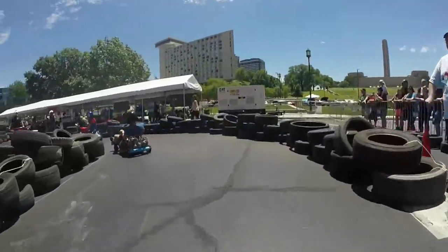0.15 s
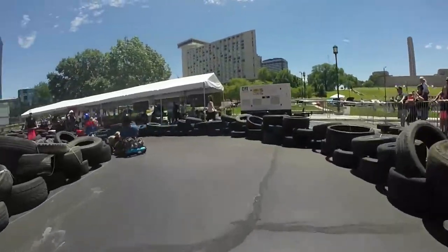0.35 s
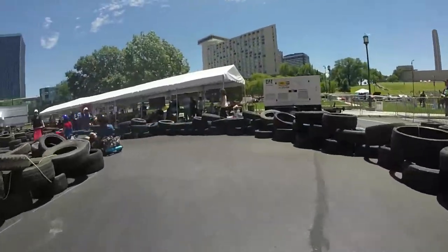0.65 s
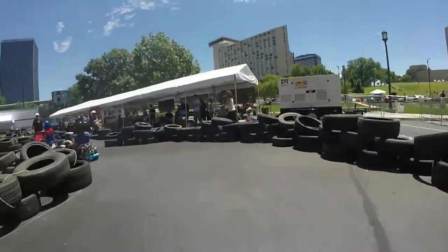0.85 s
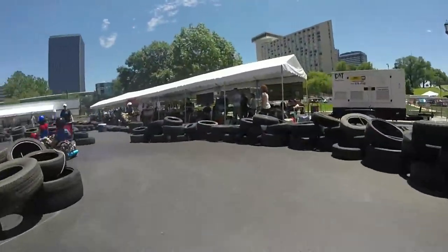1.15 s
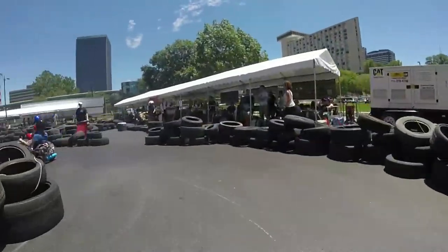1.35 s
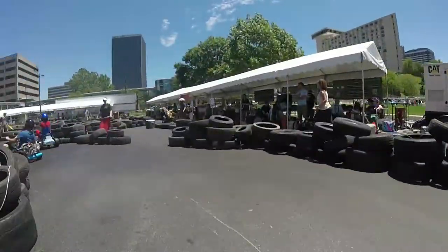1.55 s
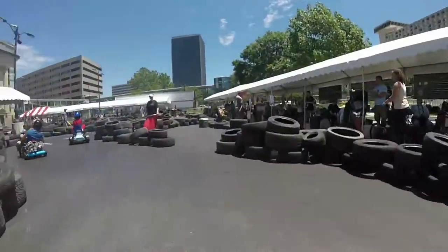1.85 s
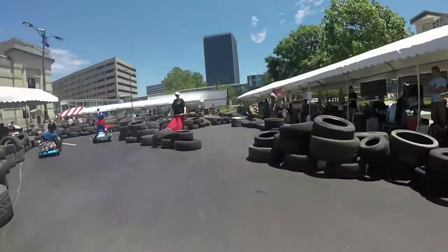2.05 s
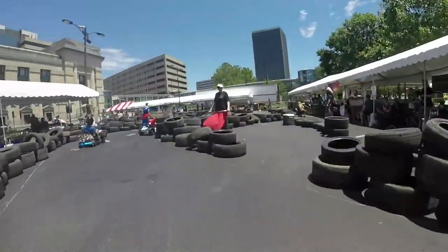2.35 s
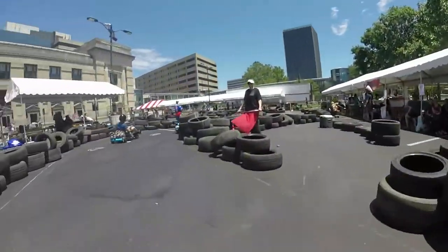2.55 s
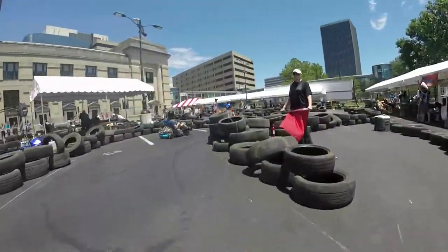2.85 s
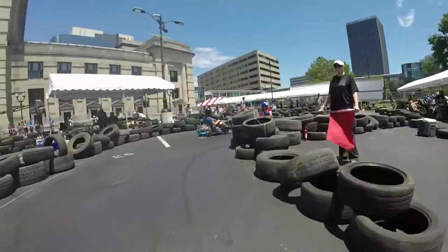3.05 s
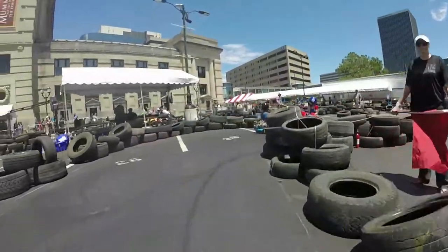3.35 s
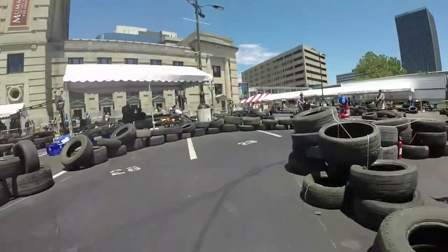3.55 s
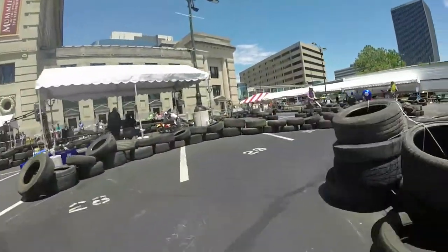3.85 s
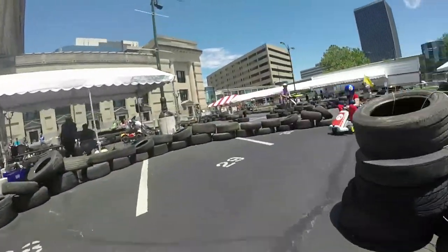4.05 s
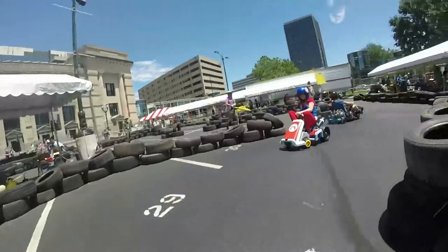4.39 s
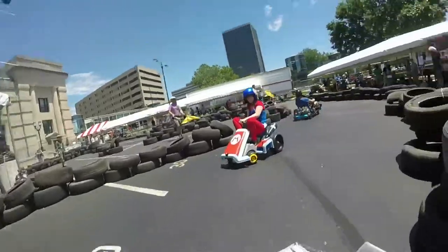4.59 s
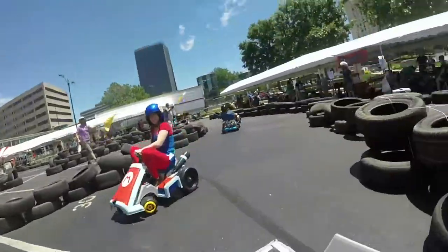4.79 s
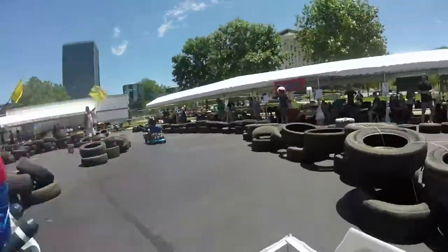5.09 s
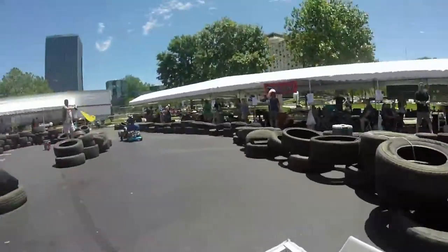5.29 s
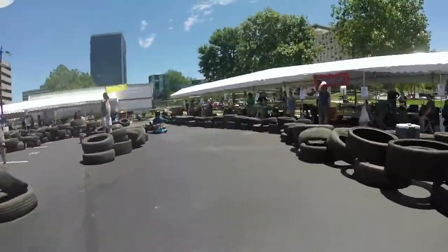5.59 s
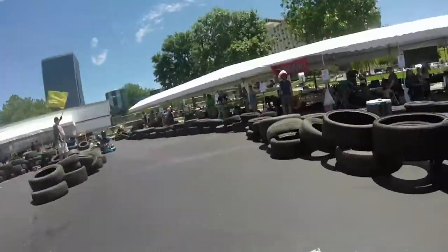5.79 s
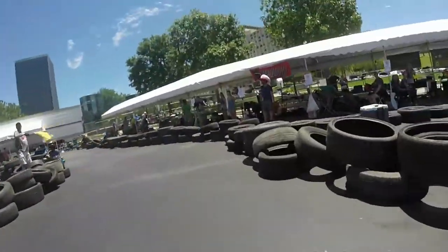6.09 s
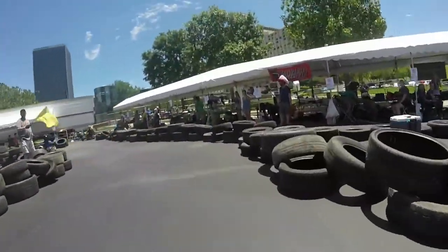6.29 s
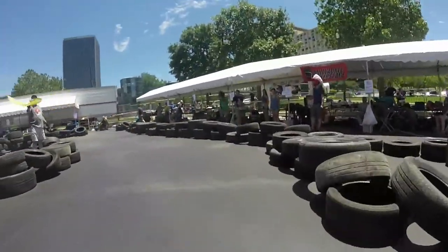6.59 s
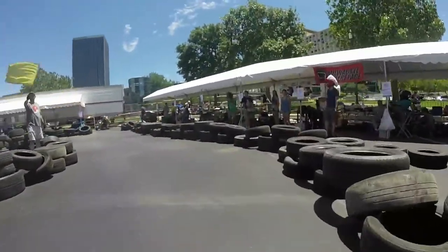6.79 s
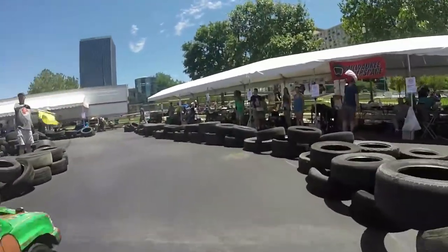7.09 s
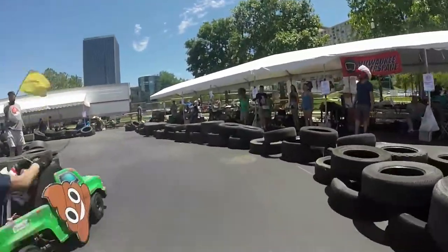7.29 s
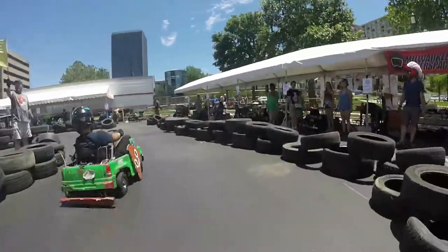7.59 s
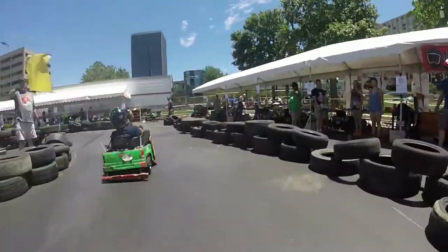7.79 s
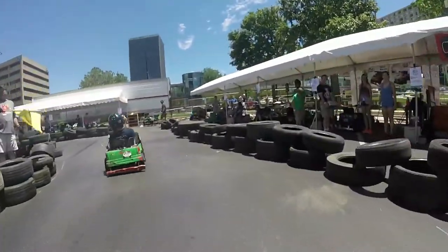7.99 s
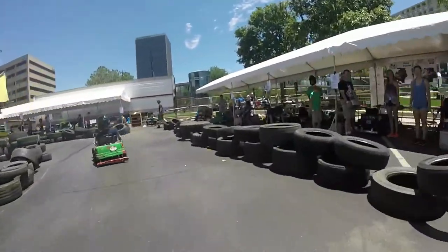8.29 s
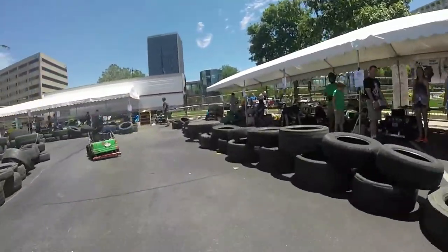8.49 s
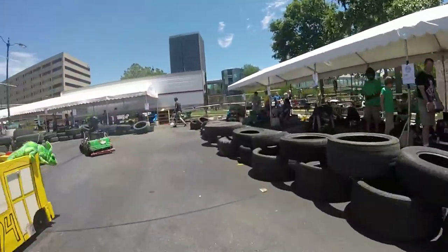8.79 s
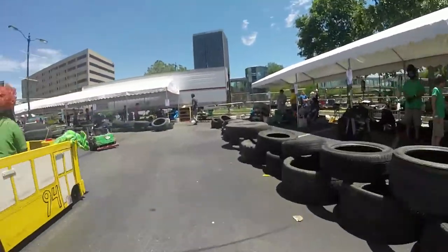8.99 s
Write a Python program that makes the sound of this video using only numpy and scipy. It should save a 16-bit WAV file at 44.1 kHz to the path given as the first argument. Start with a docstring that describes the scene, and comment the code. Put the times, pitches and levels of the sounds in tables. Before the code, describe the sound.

A cased microphone bolted to an electric kart picks up muffled, strong frame vibration. First comes a steady nasal drone of motor and chain with fine rattle and buzz. Power is released, leaving dull rumble, two main clusters of hard bumps and loose clatter, a faint squeak and the airy tyre hiss of a passing kart. Finally the motor surges in, lower and rougher, rising in pitch with scattered knocks.

```python
"""A small electric kart on asphalt, heard by a cased microphone bolted to its frame.
It cruises: motor and chain hum (sines on shaft multiples) over road rumble, rocking and faint hiss (noise, low sine).
Loose parts rattle, tick and buzz with the chain, and knock irregularly (contacts into resonances).
From 4.6 s it coasts over bumps that thud and shake loose parts, with a thin squeak (narrow noise),
as another kart's tyre hiss draws up and passes; from 6.8 s motor and chain pull again."""
import sys
import numpy as np
from scipy import signal
from scipy.fft import rfft, irfft
from scipy.io import wavfile
from scipy.ndimage import uniform_filter1d

SR = 44100
rng = np.random.default_rng(int(sys.argv[2]) if len(sys.argv) > 2 else 0)


def invert_db(level):
    """Linear amplitude ratio for a level in decibels (20 dB per decade), elementwise."""
    return 10 ** (np.asarray(level, dtype=float) / 20)


def wav_out(sig):
    """Save sig, one row per channel (or a flat mono array), as 16-bit PCM at SR to the path in sys.argv[1]."""
    wavfile.write(sys.argv[1], SR, np.round(np.clip(np.atleast_2d(sig).T, -1, 1) * 32767).astype(np.int16))


N = 403074
T = np.arange(N) / SR   # s

# power on, cruising: at_s, shaft_hz, load_db
CRUISE = [(0.0, 105.3, 2), (0.35, 106.8, 0), (0.6, 108.7, -0.5), (1.0, 111, -1.5), (1.399, 114.7, 0.5),
          (1.95, 114.5, -1), (2.15, 111.9, 1), (2.55, 109.7, -1.5), (2.851, 109.1, -0.5), (3.099, 109.5, 0),
          (3.4, 108.1, 0.5), (3.899, 108.8, 0.5), (4.079, 106.2, -0.5), (4.339, 108, 0.5),
          (4.499, 107.6, -0.5), (4.55, 101.8, -0.5), (4.6, 102.4, -17.5)]
# power on, accelerating: at_s, shaft_hz, load_db
SPEED_UP = [(6.8, 35, -13), (6.86, 37.79, -10.5), (6.9, 52.07, -4), (6.93, 63.83, -1.5), (6.981, 63.77, 0),
            (7.049, 61.93, 0), (7.35, 65.7, -2.5), (7.56, 67.93, -1), (7.72, 70.53, 0), (8.12, 76.77, -1),
            (8.22, 75.92, -2.5), (8.48, 79.24, 0.5), (8.56, 80.25, -0.5), (8.75, 81.6, 0),
            (8.92, 82.85, -2.5), (9.14, 86.8, 3.5)]
# strong multiples of the shaft rate: chain mesh, motor 3 and 4, twice the mesh, motor 6
LOUD_ORDERS = [2.1, 3, 4, 4.2, 6]
MESH_ORDER = LOUD_ORDERS[0]
# roughness of the asphalt under the tyres, as the frame feels it: at_s, level_db
RUMBLE = [(0.0, -24), (0.8, -22.5), (2.4, -25.5), (3.2, -23.5), (4.5, -23.5), (4.62, -27), (4.92, -24),
          (4.94, -14), (5.03, -17), (5.06, -20.5), (5.32, -18), (5.55, -22.5), (5.62, -32), (5.72, -29),
          (5.74, -17.5), (5.82, -23), (5.95, -28), (6.5, -25), (6.6, -19.5), (6.93, -15), (7.13, -28),
          (7.55, -26), (8.3, -23), (9.14, -22)]
CRUISE_END_S, PULL_START_S = CRUISE[-1][0], SPEED_UP[0][0]
TICKS_END_S = 3.8   # then the part shakes free and the rattle comes in gasps


def rms_one(x):
    """Scales to an rms of 1."""
    return x / np.sqrt(np.mean(x ** 2) + 1e-20)


def in_time(rows):
    """Columns of a table at every sample."""
    s, *columns = np.transpose(rows)
    return [np.interp(T, s, c) for c in columns]


def at_hz(points, hz):
    """Level (dB) read from (Hz, dB) points on a log frequency axis."""
    point_hz, point_db = np.transpose(points)
    return np.interp(np.log(hz), np.log(point_hz), point_db)


def drift(cutoff_hz):
    """Slow chance through a double one-pole low-pass; spread 1."""
    r = np.exp(-40 * np.pi * cutoff_hz / SR)   # runs at SR / 20
    noise = rng.standard_normal(N // 20 + 4002)
    slow = signal.lfilter([1], [1, -2 * r, r * r], noise)[4000:]
    return np.interp(np.arange(N) / 20, np.arange(len(slow)), rms_one(slow - slow.mean()))


def resonance(x, hz, width_hz):
    """Two-pole resonance, gain 1 on top."""
    r = np.exp(-np.pi * width_hz / SR)
    poles = [1, -2 * r * np.cos(2 * np.pi * hz / SR), r * r]
    return signal.lfilter([(1 - r * r) / 2, 0, (r * r - 1) / 2], poles, x + 1e-18)


def resonance_twice(x, hz, width_hz):
    """The same resonance twice in series, for steeper skirts."""
    return resonance(resonance(x, hz, width_hz), hz, width_hz)


def body(x, modes):
    """Parallel resonances with alternating signs."""
    return sum((-1) ** k * invert_db(db) * resonance(x, hz, width_hz)
               for k, (hz, width_hz, db) in enumerate(modes))


def cut(x, hz, kind, order=2):
    """Butterworth filter."""
    return signal.sosfilt(signal.butter(order, hz, kind, fs=SR, output="sos"), x)


def struck(events, modes, tilt_db, spread_db, contact_s, grit_share):
    """Every blow is a short dying crunch that strikes each mode with a strength of its own."""
    at = (np.array(events)[:, 0] * SR).astype(int)
    level_db = np.array(events)[:, 1]
    chance = rng.normal(0, 1, (len(at), len(modes)))
    grit, r = rng.standard_normal(N), np.exp(-1 / (contact_s * SR))
    out = 0
    for k, (hz, width_hz, db) in enumerate(modes):
        clicks = np.zeros(N)
        blow_db = level_db + db + tilt_db(hz) + spread_db * chance[:, k]
        clicks[at] = invert_db(blow_db) * SR / (2 * np.pi * width_hz)
        dying = signal.lfilter([1], [1, -r], clicks + 1e-18)
        crunch = clicks + grit_share * np.sqrt(1 - r * r) * grit * dying
        out = out + (-1) ** k * resonance(resonance(crunch, hz, width_hz), hz, 1.3 * width_hz)
    return out


def drive(rows, loud_db, faint_db, throb, waver_db, wander_db):
    """Sines on multiples of the shaft; the axle's turn makes the load throb. Returns tone and shaft turns."""
    # weaker multiples; whole = motor, steps of 2.1 = chain mesh
    faint_orders = [5, 6.3, 7, 8, 8.4, 9, 10, 10.5, 12, 12.6, 14, 14.7, 17, 18, 19, 20, 21, 24, 30, 36]
    # the frame lifts a strong multiple as it slides through a resonance: hz, gain_db
    frame_lift = [(133, -23), (160, -13.5), (171, -12.5), (182, -0.5), (193, -13.5), (206, -3.5), (228, 0),
                  (245, 3.5), (265, -6), (290, -9.5), (318, 5), (345, -5.5), (385, 1.5), (430, -8),
                  (460, -8), (500, -14.5), (522, -9.5), (632, 0.5), (655, -7.5), (685, -10.5)]
    # how well the frame passes the weak multiples: hz, gain_db
    frame_pass = [(300, 5), (780, -3), (1000, -15), (1300, 4.5), (1700, 2), (2000, -4.5), (2600, 1),
                  (3000, -15)]
    axle_order = 0.13   # axle turns per shaft turn
    shaft_hz, load_db = in_time(rows)
    fade_in = np.clip((T - rows[0][0] + 0.024) / 0.031, 0, 1)
    fade_out = np.clip((rows[-1][0] + 0.023 - T) / 0.069, 0, 1)
    on = fade_in * fade_out
    live = on > 0
    turns = np.cumsum(shaft_hz * (1 + .0012 * drift(12))) / SR
    load = invert_db(load_db) * (1 + throb * drift(0.86) * np.sin(2 * np.pi * axle_order * turns))
    wavers = [waver_db * drift(24) for k in range(4)]
    tone = np.zeros(N)
    for order, db, wander in zip(LOUD_ORDERS, loud_db, wander_db):
        lift_db = at_hz(frame_lift, order * shaft_hz)
        level_db = db + lift_db + wander * drift(4.4) + 0.15 * wavers[int(order) % 4]
        sine = np.cos(2 * np.pi * order * turns + (order - 2.1) ** 2)
        tone[live] += (invert_db(level_db) * sine)[live]
    for k, (order, db) in enumerate(zip(faint_orders, faint_db)):
        level_db = db + at_hz(frame_pass, order * shaft_hz[live]) + wavers[k % 4][live]
        tone[live] += invert_db(level_db) * np.cos(2 * np.pi * order * turns[live] + k * k)
    return np.sqrt(2) * on * load * tone, turns


def cruise():
    """Motor and chain at cruising speed, the chain mesh strongest."""
    # strong multiples, before frame and load: level_db
    strong_db = [-11, -23.5, -32.5, -30, -26]
    # weak multiples, before frame and load: level_db
    weak_db = [-44.5, -49, -63.5, -48, -34.5, -48.5, -51, -48.5, -57, -52.5, -61, -52.5, -57.5, -54.5,
               -50.5, -54.5, -58.5, -58, -66.5, -68]
    return drive(CRUISE, strong_db, weak_db, throb=0.12, waver_db=3.5, wander_db=[0.6, 2.3, 4.4, 4.0, 1.6])


def road():
    """Rough asphalt as lumpy noise into the frame modes, and the bumps as soft blows."""
    # frame resonances: hz, width_hz, level_db
    frame_modes = [(94, 67, -12.5), (173.5, 46.3, -5.5), (209.4, 49.6, -0.5), (318, 28.4, 2), (403, 60, -9),
                   (492, 80, -13.5), (630, 130, -19)]
    # bumps under the wheels: at_s, level_db
    thuds = [(4.838, -42), (4.929, -2), (4.941, -1), (4.971, -12), (4.982, 5), (4.996, 2), (5.021, 2),
             (5.081, -12), (5.239, -9), (5.383, -12), (5.429, -12), (5.728, -6), (5.769, -0.5),
             (5.858, -23), (6.071, -7.5), (6.646, -4.5), (6.771, -12), (6.826, -8), (6.87, -8)]
    level_db, = in_time(RUMBLE)
    lumpy = rng.standard_normal(N) * invert_db(2.2 * drift(22))
    rolling = invert_db(level_db) * rms_one(cut(body(lumpy, frame_modes), 650, "low"))
    damped_modes = [(hz, 1.74 * width_hz, db) for hz, width_hz, db in frame_modes]
    blows = struck(thuds, damped_modes, lambda hz: -7.0, spread_db=6.5, contact_s=0.0013, grit_share=0.4)
    bumps = cut(blows, 710, "low")
    return cut(rolling + bumps, 95, "high")


def bounce():
    """The kart rocks on its tyres at a wandering low pitch, over a dull floor; each jolt swells and dies."""
    # jolts that set it rocking: at_s, level_db
    jolts = np.array([(0.02, -26.5), (0.409, -27.5), (0.75, -27), (0.95, -31), (1.218, -34), (1.7, -36.5),
                      (1.93, -31), (2.39, -36.5), (3.0, -33), (3.3, -30.5), (3.689, -33.5), (4.0, -30.5),
                      (4.5, -26.5), (4.68, -22), (4.95, -34), (5.16, -26.5), (5.3, -33.5), (5.52, -31),
                      (5.76, -10.5), (5.949, -24.5), (6.188, -32.5), (6.079, -25.5), (6.3, -33.5),
                      (6.601, -26), (6.7, -31.5), (6.849, -19), (7.45, -37), (7.851, -30.5), (8.15, -32),
                      (8.45, -29.5), (8.85, -32.5)])
    rise_s, hold_s, fall_db_per_s, rest_db = 0.014, 0.07, 153, -38
    floor_db = -43.5
    coarse_s = np.arange(0, N, 40) / SR
    since_s = coarse_s - jolts[:, :1]
    dying = invert_db(jolts[:, 1:] - fall_db_per_s * np.maximum(since_s - hold_s, 0))
    each = dying * np.clip(1 + since_s / rise_s, 0, 1)
    swing = np.interp(T, coarse_s, np.sqrt(np.sum(each ** 2, axis=0) + invert_db(rest_db) ** 2))
    rocking_hz = 27 + 7.1 * drift(3.0)
    rocking = np.sin(2 * np.pi * np.cumsum(rocking_hz) / SR) * invert_db(0.91 * drift(6))
    # the dull low rumble is louder while coasting
    coasting_s = [CRUISE_END_S - .1, CRUISE_END_S, PULL_START_S, PULL_START_S + .1]
    coasting_db = np.interp(T, coasting_s, [-6, 7.0, 4.5, -0.5])
    dull = rms_one(cut(rng.standard_normal(N), [30, 130], "band"))
    floor = invert_db(floor_db + coasting_db + 2.1 * drift(5.5)) * (swing / swing.mean()) ** 0.59 * dull
    return np.sqrt(2) * swing * rocking + floor


def touches(tone, turns, steep_db, burst_db):
    """One contact near the crest of every chain-mesh cycle, harder on high crests, coming in quick bursts."""
    teeth = np.maximum.accumulate(np.floor(MESH_ORDER * turns + 0.055 + .013 * drift(120)))
    crest = tone / np.sqrt(uniform_filter1d(tone ** 2, size=2000) + 1e-6)
    bursts = np.tanh(3.4 * rms_one(resonance(rng.standard_normal(N), 19, 11)))
    return (np.diff(teeth, prepend=teeth[0]) > 0) * invert_db(steep_db * crest + burst_db * bursts)


def touching():
    """Strength with which the loose part rests against the frame."""
    # spells of contact once per chain tooth: start_s, length_s, level_db
    spells = [(0.12, 0.21, -67), (0.392, 0.03, -62), (0.532, 0.072, -60.5), (0.722, 0.018, -65),
              (0.876, 0.034, -57), (0.961, 0.07, -65), (1.213, 0.51, -58.5), (1.786, 0.15, -64),
              (1.973, 0.43, -60), (2.445, 0.3, -58.5), (2.785, 0.11, -58.5), (3.013, 0.2, -60.5),
              (3.336, 0.033, -60.5), (3.523, 0.098, -60), (3.774, 0.09, -62.5), (3.9, 0.061, -58),
              (4.12, 0.1, -62), (4.361, 0.04, -70.5), (4.462, 0.072, -67.5)]
    edge_s = 0.012
    strength = 0
    for start_s, length_s, db in spells:
        inside_s = np.minimum(T - start_s, start_s + length_s - T)
        strength = strength + invert_db(db) * np.clip(inside_s / edge_s + 1, 0, 1)
    return strength


def rattle(contacts, turns, per_s, in_step):
    """Uneven ticks, a scrape and the regular contacts ring in the panels; ticks and scrape follow the chain."""
    # panel resonances: hz, width_hz, level_db
    panels = [(747, 110, 0.5), (1150, 96, 0.5), (1332, 169, 1), (1660, 130, -1.5), (1849, 89, -3),
              (2263, 190, -5.5), (2590, 220, -11), (3310, 160, -14.5), (3630, 81, -19.5), (4700, 1900, -29),
              (5670, 270, -20)]
    # how hard the chain shakes the loose parts: at_s, level_db
    chain_shake = [(0.0, -33), (1.1, -35), (1.3, -32), (3.9, -33.5), (4.56, -40), (4.62, -44.5),
                   (6.46, -50.5), (6.7, -36.5), (6.85, -34.5), (6.95, -29.5), (7.25, -32), (9.14, -32.5)]
    road_share = 0.3   # dB of rattle per dB of roughness
    gasp_db, gasp_cutoff_hz, case_cut_hz = 3, 14, 4300
    (chain_db,), (road_db,) = in_time(chain_shake), in_time(RUMBLE)
    beat = np.clip(1 + in_step * np.cos(2 * np.pi * MESH_ORDER * turns), 0, 2)
    sizes = invert_db(3.0 * np.minimum(rng.exponential(1, N), 5)) * rng.choice([-1, 1], N)
    ticks = sizes * (rng.random(N) < beat ** 2 * per_s * invert_db(3.5 * drift(18)) / SR)
    scrape = beat * rng.standard_normal(N) * invert_db(2.4 * drift(36))
    shaken = rms_one(ticks) + 1.1 * scrape + 0.62 * rms_one(contacts * touching())
    level_db = chain_db + road_share * (road_db - road_db.mean()) + 0.93 * drift(8.3)
    gasping = (T > TICKS_END_S + .1) * (T < CRUISE_END_S)
    level_db = level_db + gasping * gasp_db * drift(gasp_cutoff_hz)
    return invert_db(level_db) * rms_one(cut(body(shaken, panels), case_cut_hz, "low"))


def ticks_on_beats(turns):
    """When chain and motor tones add up, a second part is thrown at its stop; some throws fall short."""
    # second loose part: hz, width_hz, level_db
    ticker = [(3304, 320, 4.5), (5060, 680, -7.5)]
    beats = np.floor((LOUD_ORDERS[1] - MESH_ORDER) * turns + .08 * drift(60))
    thrown = (np.diff(np.maximum.accumulate(beats), prepend=beats[0]) > 0) * (T < TICKS_END_S)
    hard = thrown * invert_db(2.4 * drift(7.2) + 4.3 * rng.standard_normal(N))
    rings = sum(invert_db(db) * resonance_twice(hard, hz, width_hz) for hz, width_hz, db in ticker)
    return invert_db(-59) * rms_one(rings)


def hiss():
    """Smooth bright noise, slightly flickering: faint and steady in the cruise, then the passing kart's tyres."""
    # hiss spectrum: hz, relative_db_per_hz
    spectrum = [(1500, -21), (2400, -8.5), (3000, -9.5), (3700, -5), (4100, -6), (5200, -10), (5700, -8),
                (6200, -11.5), (6900, -15.5), (7800, -15), (10000, -22.5), (13000, -26.5), (15000, -33),
                (17000, -62)]
    # tyre hiss of another kart that draws up and passes: at_s, level_db
    passing = [(4.5, -80), (4.85, -63.5), (5.5, -68.5), (5.8, -62), (6.46, -52), (6.77, -48.5),
               (7.41, -48.5), (7.48, -52.5), (8.5, -59), (9.14, -57.5)]
    passing_db, = in_time(passing)
    hz = np.maximum(np.fft.rfftfreq(N, 1 / SR), 1)
    noise = irfft(rfft(rng.standard_normal(N)) * invert_db(at_hz(spectrum, hz)), N)
    faint = invert_db(-69.5) * (T < CRUISE_END_S)
    return (faint + invert_db(passing_db)) * invert_db(2.6 * drift(9.9)) * rms_one(noise)


def knocks():
    """Heavy contacts wake the lower modes, hard ones the upper; small ones come at random in spells."""
    # loose parts knocking: at_s, level_db, depth_db, brightness_db
    single = [(0.06, -38, -8, -6), (0.168, -30, -8, -12.5), (0.255, -32, -7, -10), (0.314, -33, -6, -11),
              (0.579, -29, -8, -8), (4.006, -25.5, -6, -15), (4.207, -29, -4, -16), (4.6105, -24, -8, -45),
              (4.9273, -28, 7, -19), (4.9452, -27, 9, -31), (4.9716, -28, 15, -30), (4.9832, -38, 2, -17),
              (5.0216, -36.5, 7.5, -10), (5.1214, -33.5, -2, -15), (5.1643, -5.5, -9, -27),
              (5.1894, -11.5, -7, -37), (5.2093, -25, -6.5, -24), (5.234, -15, -12, -22),
              (5.2522, -19.5, -3.5, -31), (5.4338, -34.5, 6.5, -19), (5.621, -37.5, -7, -5.5),
              (5.734, -19, -4.5, -38), (5.763, -23, -10, -19), (5.7748, -28, 13, -23),
              (5.791, -30, -14, -1.5), (5.7991, -6.5, -8.5, -35), (5.842, -25, -17, -32),
              (5.9964, -37.5, 2, -23), (6.027, -19.5, -9, -27), (6.0557, -20, -9, -30),
              (6.2212, -33.5, 4, -19), (6.2344, -17.5, -11.5, -30), (6.2892, -37, 10, -16),
              (6.4056, -38, 13.5, -16), (6.551, -28.5, 1, -10.5), (6.5824, -19.5, -6.5, -24),
              (6.6473, -21, 2, -22), (6.6972, -23.5, -15, -25), (6.7402, -25.5, -24, -7),
              (6.803, -16.5, 6, -27), (6.845, -26, 4, -21), (6.871, -17.5, -18, -29),
              (6.9027, -20, -24, -31), (7.2045, -23.5, -4, -26), (7.2231, -21, 2.5, -25),
              (7.2902, -24.5, 4.5, -20), (7.628, -25, 6, -16), (7.652, -17, -8, -26),
              (8.0782, -16, 1.5, -18), (8.1738, -20, -5, -18), (8.436, -32, -8, -14),
              (8.4836, -28, -9, -7.5), (9.0475, -21, 3, -21.5)]
    # many small knocks, on rough patches, coasting, as the chain takes up: start_s, length_s, per_s, level_db
    chatter = [(3.781, 0.2, 200, -26), (4.0, 0.55, 30, -25), (4.618, 2.2, 28, -34.5),
               (4.928, 0.092, 260, -29.5), (5.729, 0.13, 130, -29), (6.883, 0.16, 190, -24.5)]
    # loose-part resonances: hz, width_hz, level_db
    part_modes = [(794, 260, -0.5), (1170, 130, -11), (1465, 250, 1), (1900, 290, -4.5), (2296, 240, 0.5),
                  (2676, 460, -9), (3230, 220, -11), (3780, 600, 1.5), (4700, 410, -1.5), (5640, 250, -2.5),
                  (6360, 330, -5.5), (7700, 900, -14)]
    small_depth_db, small_bright_db, small_spread_db = -1.5, -25.5, 3.0
    small = []
    for start_s, length_s, per_s, db in chatter:
        for u, v in rng.random((int(per_s * length_s), 2)):
            level_db = db + small_spread_db * np.log(v + .01)
            small.append((start_s + length_s * u, level_db, small_depth_db, small_bright_db))
    blows = single + small
    deep_db, bright_db = np.array(blows)[:, 2:].T

    def colour_db(hz):
        return -3.0 + (hz < 1700) * (deep_db + 1.5) + (hz > 3500) * (bright_db + 7.0)
    return struck(blows, part_modes, colour_db, spread_db=2.0, contact_s=.004, grit_share=.92)


def buzz(contacts):
    """The contacts ring in the short bright modes of a loose part while it rests against the frame."""
    # buzzing part: hz, width_hz, level_db
    buzzer = [(3300, 500, 15), (6200, 950, 13), (8600, 950, 4), (11900, 1500, 2), (14000, 1000, -11)]
    rings = sum(invert_db(db) * resonance_twice(contacts, hz, width_hz) for hz, width_hz, db in buzzer)
    return touching() * rms_one(rings)


def squeak():
    """A thin rubbing squeak while coasting: noise through one narrow resonance, twice."""
    # squeak, before a 0.5 dB lift: at_s, level_db
    course = [(4.7, -76), (4.9, -66), (5.088, -72), (5.29, -62), (5.31, -55.5), (5.39, -63), (5.446, -71),
              (5.622, -73), (5.7, -60), (5.9, -80), (6.73, -80), (6.745, -33), (6.77, -71)]
    before, after = [(course[0][0] - .05, -120)], [(course[-1][0] + .3, -120)]
    level_db, = in_time(before + course + after)
    thin = resonance_twice(rng.standard_normal(N), hz=3670, width_hz=100)
    return invert_db(level_db + 0.5) * rms_one(thin)


def pull():
    """Motor and chain accelerating, the sixth motor multiple strong."""
    # strong multiples, before frame and load: level_db
    strong_db = [-16, -18.5, -21.5, -23, -7.5]
    # weak multiples, before frame and load: level_db
    weak_db = [-35, -47.5, -44.5, -39, -47, -39, -43, -42, -30, -46.5, -41, -50.5, -41, -40.5, -52.5, -47,
               -46, -44.5, -54.5, -49.5]
    return drive(SPEED_UP, strong_db, weak_db, throb=0.031, waver_db=2.5, wander_db=[1.9, 0.76, 1.9, 3.0, 1.8])


def scene():
    """Sums frame sounds, loose parts and hiss."""
    cruising, fast_turns = cruise()
    pulling, slow_turns = pull()
    cruise_on = T < CRUISE_END_S
    turns = np.where(cruise_on, fast_turns, slow_turns)
    contacts = cruise_on * touches(cruising, fast_turns, steep_db=4.0, burst_db=2.5)
    frame = cruising + pulling + road() + bounce()
    loose = rattle(contacts, turns, per_s=600, in_step=0.33) + ticks_on_beats(fast_turns)
    loose += knocks() + buzz(contacts) + squeak()
    return (frame + loose + hiss())[None]


def band_limit(x):
    """A steep low-pass at the top of the band."""
    return signal.sosfilt(signal.butter(12, 15350, fs=SR, output="sos"), x)


def record(dry):
    """Rounds off the highest peaks."""
    top = .88   # full scale = 1
    rounded = dry / (1 + (dry / top) ** 6) ** (1 / 6)
    return band_limit(rounded)


dry = scene()
out = record(dry)
wav_out(out)
```